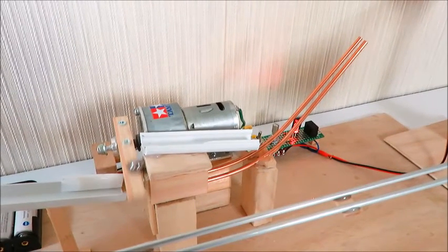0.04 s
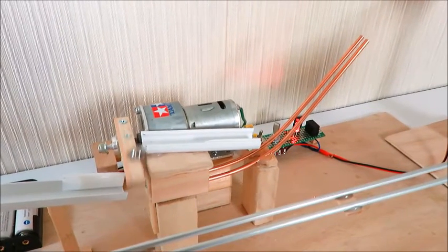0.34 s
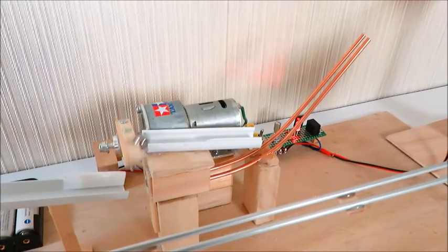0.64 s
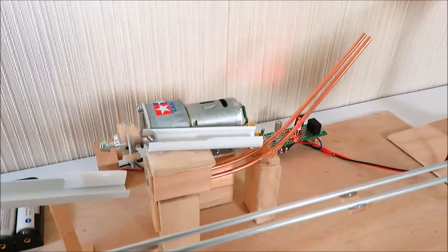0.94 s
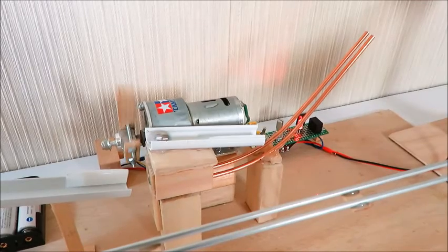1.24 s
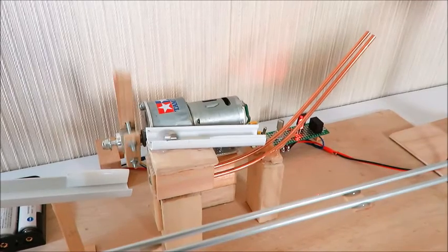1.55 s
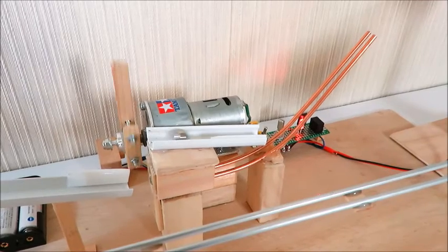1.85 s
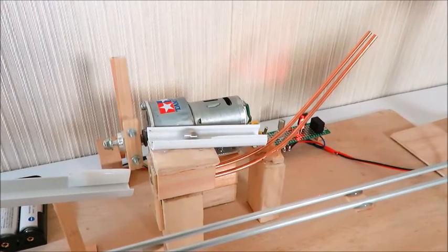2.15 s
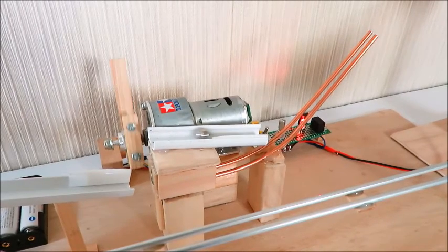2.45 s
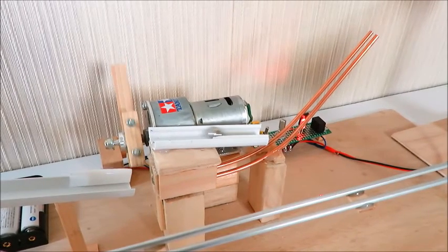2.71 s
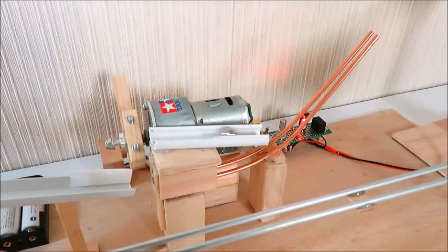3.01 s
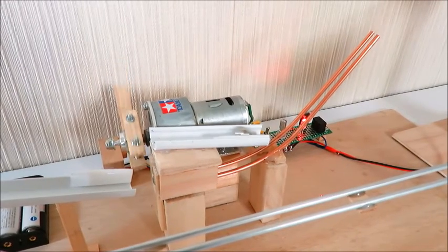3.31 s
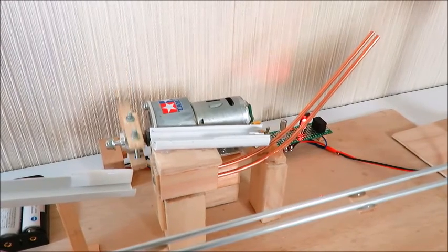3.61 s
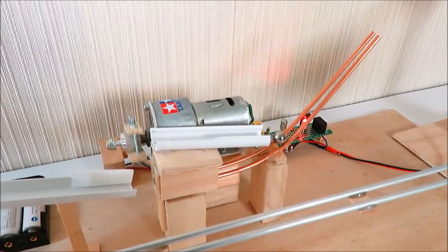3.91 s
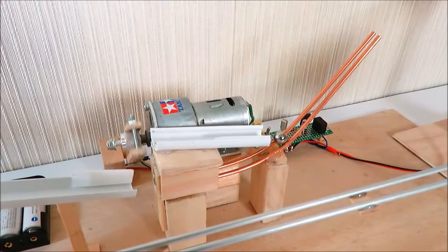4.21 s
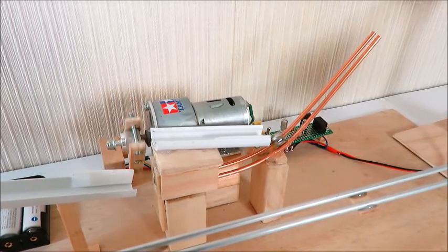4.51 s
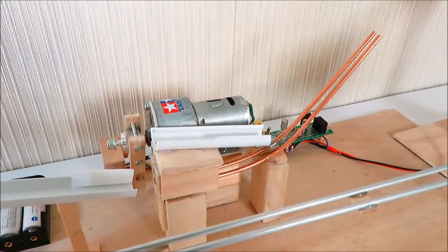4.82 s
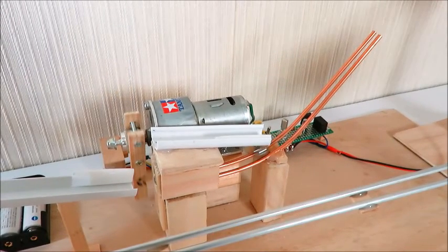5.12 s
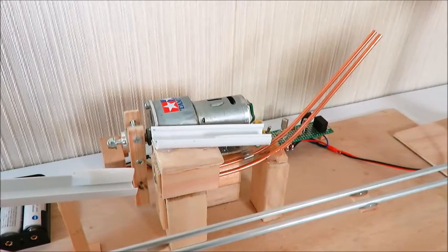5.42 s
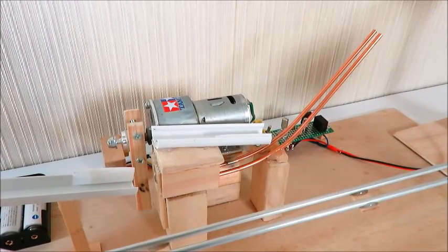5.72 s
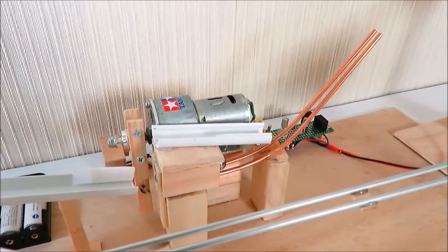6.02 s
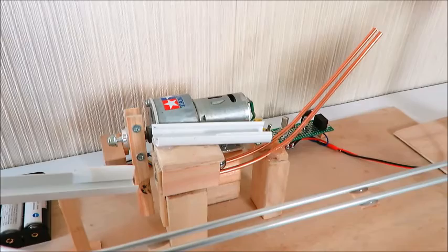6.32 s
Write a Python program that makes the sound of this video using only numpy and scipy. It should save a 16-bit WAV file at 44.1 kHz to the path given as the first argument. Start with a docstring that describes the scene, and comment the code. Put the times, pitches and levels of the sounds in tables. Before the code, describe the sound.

A marble machine whirrs and drones, deep as in slow motion, with wooden knocks, a rolling metal ball and one heavy clank.

```python
"""A marble machine heard close up on a stereo microphone pair, deep as in slow motion, ending near 2 kHz.
A gear motor whirrs on a droning base board and a low throb dies away, while a wooden lifting arm slides
round, squeaks and knocks. At 1.5 s it drops a steel ball into a trough; the ball bumps along, slowing.
Just after 4 s the launcher shoots it off with a loud clank that overloads the microphones. The ball runs
along wire rails, clacks against them and returns with a hard clack at about 6 s."""
import sys
import numpy as np
from scipy.fft import rfft, irfft, next_fast_len
from scipy.io import wavfile
from scipy.ndimage import map_coordinates

SR = 44100
rng = np.random.default_rng(int(sys.argv[2]) if len(sys.argv) > 2 else 0)


def bounce(signal):
    """Save signal as a 16-bit WAV file at the path given by the first command-line argument."""
    frames = np.transpose(np.atleast_2d(signal))
    limited = np.clip(frames, -1, 1)
    pcm = np.round(limited * 32767).astype(np.int16)
    wavfile.write(sys.argv[1], SR, pcm)


N = 288899

# Levels over time. Each row: time in seconds, relative level in dB.
MOTOR_EFFORT = [(0, -55.5), (0.95, -49), (2.2, -52.5), (3.3, -48), (4.4, -47), (4.65, -60), (6.55, -53)]  # hardest around the launch, then it idles
BASS_BETWEEN_BLOWS = [(0, -38), (0.45, -42), (0.8, -60), (1.03, -34.5), (1.62, -39.5), (2.2, -47),
                      (3.4, -40), (5.1, -45), (5.75, -48.5), (6.55, -47)]
# Pulsing of the gears. Each row: pulses per shaft turn, depth as a fraction.
GEAR_PULSES = [(1, 0.17), (2, 0.073), (4, 0.16), (5, 0.22), (11, 0.12), (12, 0.18)]
# Whine of the gears. Each row: frequency in Hz, relative level in dB.
GEAR_TONES = [(107, -3), (786, -7.5), (1428, -6.5), (1470, -14), (1583, -4.5), (1611, -11.5)]
# Colours of the noises. Each row: frequency in Hz, relative spectral density in dB.
GEAR_SPECTRUM = [(200, -34), (500, -11), (780, -7), (950, -16.5), (1200, -6), (1390, -12), (1440, -5),
                 (1520, -12.5), (1600, -1), (1680, -8.5), (1830, -28), (1920, -9), (2050, -29)]
DRONE_SPECTRUM = [(90, -22), (140, -8), (165, -3), (182, 3), (205, -0.5), (240, -6.5), (285, -3.5),
                  (320, -5.5), (355, -20.5), (395, -5), (430, -17.5), (470, -19.5), (650, -15.5),
                  (1200, -57)]
RUMBLE_SPECTRUM = [(5, -8.5), (14, -2), (35, 2), (48, -17), (62, 4), (85, -7.5), (115, -5), (170, -16),
                   (400, -86)]
SLIDE_SPECTRUM = [(150, -30.5), (230, 0), (280, 8.5), (340, -16), (400, -5), (480, -5.5), (620, -13.5),
                  (730, -2.5), (800, -7), (900, -2.5), (1015, -13.5), (1200, -10.5), (2000, -21.5)]
SQUEAK_SPECTRUM = [(850, -32.5), (930, -3.5), (962, 0), (990, -6), (1040, -29)]
TROUGH_ROLL_SPECTRUM = [(150, -27.5), (300, 0), (420, 4), (510, -5.5), (600, -2), (700, -17), (800, -2.5),
                        (1000, -12), (1250, -10.5), (2000, -21.5)]
RAIL_ROLL_SPECTRUM = [(150, -10.5), (300, 5), (390, 0), (470, -3), (620, -1.5), (725, 0.5), (830, -2.5),
                      (1000, -4.5), (1140, -3), (1270, -4), (1400, -4.5), (1650, -10.5), (1850, -5.5),
                      (2050, -45)]
# Squeaks of the sliding arm. Each row: start in seconds, length in seconds, level in dB.
ARM_SQUEAKS = [(0.246, 0.12, -40.5), (0.691, 0.3, -37.5)]
# Blows on each part. Each row: start in seconds, level in dB, brightness in dB per octave,
# extra body in dB, contact time in seconds.
ARM_BLOWS = [(0.26, -49, -4.5, -4, 0.0055), (0.316, -39, -10, 2.5, 0.0045), (1.125, -21.5, 0, 1, 0.0017),
             (1.202, -45, -5, 0, 0.0026), (1.247, -33, -1.5, -4, 0.004), (1.304, -39, -3, -5.5, .003)]
RAIL_BLOWS = [(0.993, -33.5, -2.5, -14.5, 0.0019), (1.283, -42, -0.5, -1, 0.0046),
              (4.271, -41, 2.5, -4.5, 0.003), (4.477, -32.5, -4, -1.5, 0.0018),
              (5.32, -46.5, -7, 1.5, .002), (5.364, -49.5, -4, 1, 0.0031), (6.09, -21.5, 0.1, 0.5, .005),
              (6.1, -29, 0, -0.5, 0.0026), (6.17, -48.5, 1, 12, .0088), (6.268, -53, 3.5, 16.5, .01),
              (6.326, -30.5, -4, -12, 0.0047)]
TROUGH_BLOWS = [(1.491, -24, 0.6, 0.5, 0.01), (1.509, -29, -1, -2.5, 0.0044), (1.571, -39, -1, 3, .014),
                (1.69, -39.5, -3.5, -2, 0.0046), (1.843, -37, -1.5, 0.5, 0.0053),
                (1.929, -42.5, -6, -8.5, 0.0026), (2.24, -50, 2, 10.5, .011),
                (2.523, -46.5, -0.5, 6, 0.0065), (2.629, -48.5, -3, 5.5, 0.0056),
                (2.728, -52.5, 0, 7.5, 0.0091), (3.244, -51, -5.5, -8, 0.0033),
                (3.456, -50.5, -4, -14, .004), (3.541, -45.5, -2, -2, 0.0015), (3.611, -50, -3.5, -6, .004)]
LAUNCHER_BLOWS = [(4.125, -40, 2.2, 0.013, 0.0043), (4.134, -35.5, 3.5, 0, 0.0017),
                  (4.1444, -10.5, -0.5, 0, .002), (4.155, -19, 0.5, 1, 0.0027)]
# Ringing of each part. Each row: frequency in Hz, relative level in dB, seconds to fall by 60 dB.
ARM_MODES = [(179.4, 5.5, 0.12), (286, 2.5, 0.074), (356.7, -3, 0.086), (533, -3.5, 0.087),
             (630, -11.5, 0.036), (706.4, 5, 0.056), (834, -11.5, .035), (970, -9, 0.023),
             (1034, -10, 0.058), (1170, 2, 0.038), (1380, -4.5, 0.037), (1740, -24, .04)]
RAIL_MODES = [(178, -2.5, 0.072), (340, -7, 0.1), (361, -2.5, 0.17), (405, 3.5, 0.074), (483, -9.5, 0.08),
              (712, -10.5, 0.11), (860, -7.5, 0.12), (928, -13, 0.12), (1044, -12, 0.095),
              (1323, -6, 0.053), (1366, -13.5, 0.11), (1526, -5, 0.06), (1643, -6.5, 0.059),
              (1735, -15, .05), (1884, -17.5, 0.034)]
TROUGH_MODES = [(194.3, -17.5, 0.073), (297.5, -5, 0.029), (409.6, 1, 0.1), (521, -22.5, 0.13),
                (621, 0, .09), (796, -4.5, .09), (889, -2.5, 0.16), (1070, -24.5, 0.056),
                (1350, -22.5, .08), (1368, -7, 0.069), (1500, -20.5, 0.054), (1622, -10.5, 0.089),
                (1862, -11.5, 0.051)]
LAUNCHER_MODES = [(66.5, -24.5, 0.56), (176, 2, 0.075), (243.6, -0.5, 0.033), (290, -0.5, .05),
                  (384, -16, 0.29), (558, -16, 0.096), (720.6, -8, .085), (923, -11.5, 0.036),
                  (923.5, -18, 0.092), (1141, -3.5, 0.069), (1496, -18, 0.08), (1530, -10.5, 0.054),
                  (1819, -15, 0.072), (2020, -17, 0.076)]
# The five edges, in Hz, of a blow's four registers: thump, body, ring, click.
REGISTER_EDGES = [110, 300, 620, 1200, 2100]
# How each part answers a blow. Each list: thump, body, ring and click in dB relative to the blow.
ARM_REGISTERS = [5, 4.5, 2.6, -11.5]
RAIL_REGISTERS = [-5, 1.8, -1.5, 5]
TROUGH_REGISTERS = [6, 4.8, -2.5, -4]
LAUNCHER_REGISTERS = [5, 0, 1.65, -7.5]
# The ball's runs along the wires. Each row: start in seconds, level in dB, fade in dB per second.
WIRE_RUNS = [(4.2, -26, 42), (6.12, -40.5, 26)]
# How alike the two microphones hear a noise. Each row: frequency in Hz, left-right correlation.
MIC_LIKENESS = [(60, 0.98), (150, 0.97), (300, 0.97), (600, 0.46), (1000, 0.63), (1600, 0.28)]

SHAFT_HZ = 12  # turns a second
NOISE_TOP_HZ = 1903.5  # all the noise is cut off steeply near 1.9 kHz
ROLL_ATTACK_S, ROLL_RELEASE_S = 0.07, 0.1


def amp(db):
    """Decibels to gain."""
    return 10 ** (np.asarray(db) / 20)


def unit(x):
    """x at rms 1."""
    return x / np.sqrt(np.mean(x ** 2) + 1e-20)


def along(points, hz):
    """The value at hz of a curve through (Hz, value) points on a log axis."""
    point_hz, values = np.transpose(points)
    return np.interp(np.log(hz + 1), np.log(np.sort(point_hz) + 1), values)


def gains(rows):
    """One gain per sample from (seconds, dB) points."""
    return amp(np.interp(np.arange(N) / SR, *np.transpose(rows)))


def since(start):
    """Seconds since start, zero before it."""
    return np.maximum(np.arange(N) / SR - start, 0)


def held(start, end, attack, release):
    """An envelope that rises from start, holds until end and falls."""
    return np.clip(since(start) / attack, 0, 1) * np.clip(1 - since(end) / release, 0, 1)


def fading(start, db, attack, fade_db_per_s):
    """An envelope that rises from start and dies away steadily."""
    return np.clip(since(start) / attack, 0, 1) * amp(db - fade_db_per_s * since(start))


def wobble(rate):
    """A smooth random curve, rate knots a second."""
    knots = rng.standard_normal(int(N * rate / SR) + 4)
    return map_coordinates(knots, [np.arange(N) * rate / SR])


def filtered(x, response):
    """x through a filter whose gain is response(Hz)."""
    length = x.shape[-1]
    padded = next_fast_len(length + 8192)
    return irfft(rfft(x, padded) * response(np.fft.rfftfreq(padded, 1 / SR)), padded)[..., :length]


def stereo(pair, spectrum):
    """Two unrelated signals become coloured noise of rms 1, partly alike at the two microphones."""
    def response(hz):
        angle = np.arccos(np.clip(along(MIC_LIKENESS, hz), -1, 1)) / 2
        colour = amp(along(spectrum, hz)) / np.sqrt(1 + (hz / NOISE_TOP_HZ) ** 100)
        return colour * [np.cos(angle), np.sin(angle)]
    mid, side = filtered(pair, response)
    return unit(np.array([mid + side, mid - side]))


def placed(x, right_lead_ms, left_db):
    """A source's place: how much sooner the right microphone hears it, how much louder the left."""
    sides = np.array([[1], [-1]])
    lag_s = right_lead_ms / 1000
    return amp(sides * left_db / 2) * filtered(x, lambda hz: np.exp(-1j * np.pi * hz * lag_s * sides))


def rubbing(spectrum, rate, grain_db):
    """Fine friction noise with tiny random contacts, rate a second."""
    contacts = (rng.random(N) < rate / SR) * rng.standard_normal((2, N))
    return stereo(rng.standard_normal((2, N)) + amp(grain_db) * unit(contacts), spectrum)


def motor():
    """Just left of centre, the gears whirr in pulses tied to the shaft and whine faintly."""
    speed = 1 + 0.002962 * wobble(2.8) + 0.003 * wobble(30)  # never quite steady
    clock = np.cumsum(speed) / SR
    pulsing = 1 + sum(depth * np.cos(2 * np.pi * (order * SHAFT_HZ * clock + rng.random()))
                      for order, depth in GEAR_PULSES)
    whine = sum(amp(db) * np.sin(2 * np.pi * (hz * clock + rng.random())) for hz, db in GEAR_TONES)
    whirr = rubbing(GEAR_SPECTRUM, rate=84, grain_db=-10.5)
    gears = amp(1.5) * gains(MOTOR_EFFORT) * pulsing * (whirr + whine)
    return placed(gears, right_lead_ms=-0.068, left_db=0.7)


def board():
    """The base board drones and rumbles under the motor, and more strongly after each blow."""
    shake = shaking()
    drone_level = amp(-2.5) * np.hypot(amp(-40.5), shake)
    drone = drone_level * rubbing(DRONE_SPECTRUM, rate=32, grain_db=-7)
    rumble_level = amp(2) * np.hypot(gains(BASS_BETWEEN_BLOWS), amp(-8) * shake)
    rumble = rumble_level * stereo(rng.standard_normal((2, N)), RUMBLE_SPECTRUM)
    return placed(drone, right_lead_ms=0.075, left_db=-0.6) + rumble


def throb():
    """A very deep throb on both microphones dies away in the first half second."""
    spectrum = [(8, -29.5), (14, -11.5), (20, 12), (35, -16), (70, -32), (200, -71.5)]  # Hz, dB
    return amp(-22.5 - 28 * since(0)) * stereo(rng.standard_normal((2, N)), spectrum)


def arm():
    """Near the centre, the wooden arm slides round, squeaks faintly and knocks as it takes the ball up."""
    slide_end_s, release_s = 1.127, 0.11
    pressure = amp(-37.5 + 4.5 * since(0))  # it rubs harder as it lifts
    release = np.clip(1 - since(slide_end_s) / release_s, 0, 1)
    slide = pressure * release * rubbing(SLIDE_SPECTRUM, rate=170, grain_db=-11)
    squeak_level = sum(amp(db) * held(start, start + length, attack=0.025, release=0.17)
                       for start, length, db in ARM_SQUEAKS)
    squeak = squeak_level * rubbing(SQUEAK_SPECTRUM, rate=160, grain_db=-4.5)
    knocks = strikes(ARM_BLOWS, ARM_MODES, ARM_REGISTERS, clatter_db=-4.5, clatter_t60=0.075, vary_db=5.5)
    friction = placed(slide + squeak, right_lead_ms=0.2, left_db=-1)
    return friction + placed(knocks, right_lead_ms=-0.037, left_db=-0.1)


def registers(tone, db, brightness):
    """The dB of a blow's four registers: the part's tone, tilted by the hardness of the blow."""
    octaves = np.log2(np.multiply(REGISTER_EDGES[1:], REGISTER_EDGES[:-1])) / 2
    return db + np.array(tone) + brightness * (octaves - octaves.mean())


def voiced(blow, levels_db):
    """Where and how hard a blow lands sets the strength of its registers over the first 35 ms."""
    edges, head = np.array(REGISTER_EDGES), int(0.035 * SR)
    centres = np.sqrt(edges[1:] * edges[:-1])
    for _ in range(2):
        power = 2 * np.abs(rfft(blow.mean(0)[:head], SR)) ** 2 / (SR * head)
        change_db = levels_db - 10 * np.log10(np.add.reduceat(power, edges)[:-1] + 1e-20)
        deep_bass = (edges[0], np.median(change_db))  # follows the whole
        curve = [deep_bass, *zip(centres, change_db)]
        blow = filtered(blow, lambda hz: amp(along(curve, hz)))
    return blow


def strikes(blows, modes, tone, clatter_db, clatter_t60, vary_db):
    """Each blow rings the part's modes and a dense clatter of the frame around it."""
    t = np.arange(SR // 2) / SR
    out = np.zeros((2, N + SR))
    hz, mode_db, t60 = np.transpose(modes)[:, :, None]
    frame_spectrum = [(60, -17.5), (180, -5.5), (600, -3), (2000, -15)]  # Hz, dB
    for start, db, brightness, body_db, contact_s in blows:
        struck_db = mode_db + vary_db * rng.standard_normal(hz.shape)
        decays = amp(struck_db - 60 * t / t60)
        ring = np.sum(decays * np.sin(2 * np.pi * (hz * t + rng.random(hz.shape))), 0)
        clatter = stereo(rng.standard_normal((2, len(t))), frame_spectrum) * amp(-60 * t / clatter_t60)
        onset = 1 - np.exp(-t / max(contact_s, 1e-4))
        blow = (unit(ring) + amp(clatter_db) * unit(clatter)) * onset
        levels_db = registers(tone, db, brightness)
        levels_db[1] += body_db  # some spots ring more hollowly than others
        out[:, round(start * SR):][:, :len(t)] += voiced(blow, levels_db)
    return out[:, :N]


def shaking():
    """The level of the board's shaking: each blow adds to it in step with its thump, then it dies away."""
    parts = [(ARM_BLOWS, ARM_REGISTERS), (TROUGH_BLOWS, TROUGH_REGISTERS),
             (LAUNCHER_BLOWS, LAUNCHER_REGISTERS), (RAIL_BLOWS, RAIL_REGISTERS)]
    power = np.zeros(N)
    for blows, tone in parts:
        for start, db, brightness, *_ in blows:
            thump_db = registers(tone, db, brightness)[0]
            power += fading(start, -17.5 + 0.73 * thump_db, attack=0.069, fade_db_per_s=34.5) ** 2
    return np.sqrt(power)


def rails():
    """Straight ahead, the ball clacks on metal and runs down the wires, slowing, on launch and return."""
    speed = sum(fading(start, db, ROLL_ATTACK_S, fade) for start, db, fade in WIRE_RUNS)
    roll = speed * amp(0.83 * wobble(13)) * rubbing(RAIL_ROLL_SPECTRUM, rate=110, grain_db=-10.5)
    clacks = strikes(RAIL_BLOWS, RAIL_MODES, RAIL_REGISTERS, clatter_db=-8.5, clatter_t60=0.1, vary_db=3)
    return (placed(roll, right_lead_ms=-0.05, left_db=0.3)
            + placed(clacks, right_lead_ms=-0.099, left_db=0.2))


def trough():
    """A little to the right, the ball falls into the trough, rebounds and bumps along, slowing down."""
    landing, launch = TROUGH_BLOWS[0][0], LAUNCHER_BLOWS[-1][0]
    fast_db, slow_db, settle_s = -30.5, -54, 0.86
    speed_db = slow_db + (fast_db - slow_db) * np.exp(-since(landing) / settle_s)
    roll_level = held(landing, launch, ROLL_ATTACK_S, ROLL_RELEASE_S) * amp(speed_db + 1.4 * wobble(14))
    roll = roll_level * rubbing(TROUGH_ROLL_SPECTRUM, rate=21, grain_db=-10)
    blows = list(TROUGH_BLOWS) + soft_bumps(landing, launch, count=5)
    bumps = strikes(blows, TROUGH_MODES, TROUGH_REGISTERS, clatter_db=-4, clatter_t60=0.097, vary_db=7)
    return placed(roll + bumps, right_lead_ms=0.17, left_db=-2)


def soft_bumps(start, end, count):
    """Faint chance blows scattered over the ball's way along the trough."""
    db, spread_db, brightness, body_db, contact_s = -55.5, 1.5, -3.5, 0, 0.007
    times = start + (end - start) * (np.arange(count) + rng.random(count)) / count
    return [(time, db + spread_db * rng.standard_normal(), brightness, body_db, contact_s)
            for time in times]


def launcher():
    """A little to the left, two small ticks, then a heavy clank and its rebound as the ball is shot off."""
    clank = strikes(LAUNCHER_BLOWS, LAUNCHER_MODES, LAUNCHER_REGISTERS,
                    clatter_db=-16, clatter_t60=0.13, vary_db=3.5)
    return placed(clank, right_lead_ms=-0.1, left_db=1.8)


def scene():
    """The whole machine as it reaches the microphone pair."""
    return motor() + board() + throb() + arm() + trough() + launcher() + rails()


def saturate(x, ceiling, hardness):
    """Overload rounds the peaks off below a ceiling."""
    return x / (1 + np.abs(x / ceiling) ** hardness) ** (1 / hardness)


def record(dry):
    """The loudest blows overload the microphones; the band ends near 2 kHz; tall peaks saturate again."""
    slow_motion_top_hz = 2007
    overloaded = saturate(dry, ceiling=0.99, hardness=8)
    deep = filtered(overloaded, lambda hz: 1 / np.sqrt(1 + (hz / slow_motion_top_hz) ** 90))
    return filtered(saturate(deep, ceiling=1, hardness=40), lambda hz: hz < 16000)


dry = scene()
out = record(dry)
bounce(out)
```